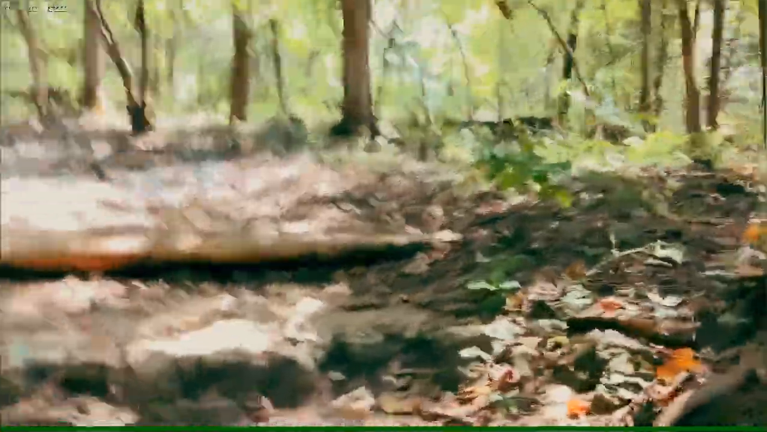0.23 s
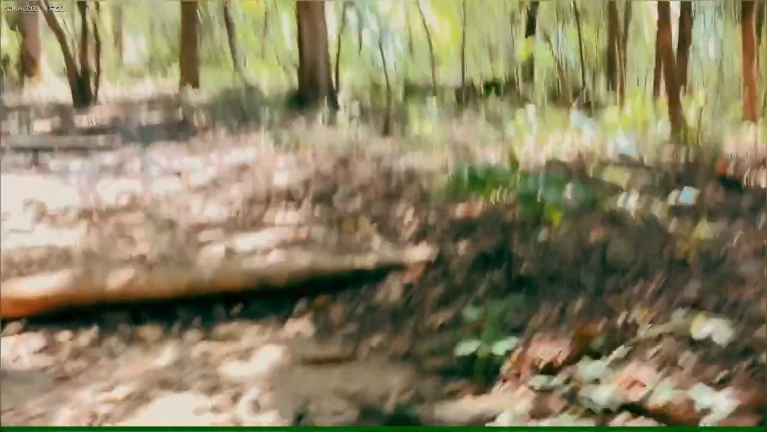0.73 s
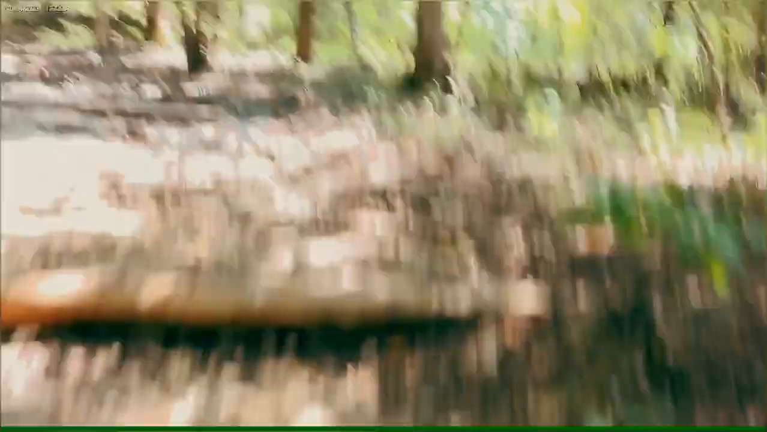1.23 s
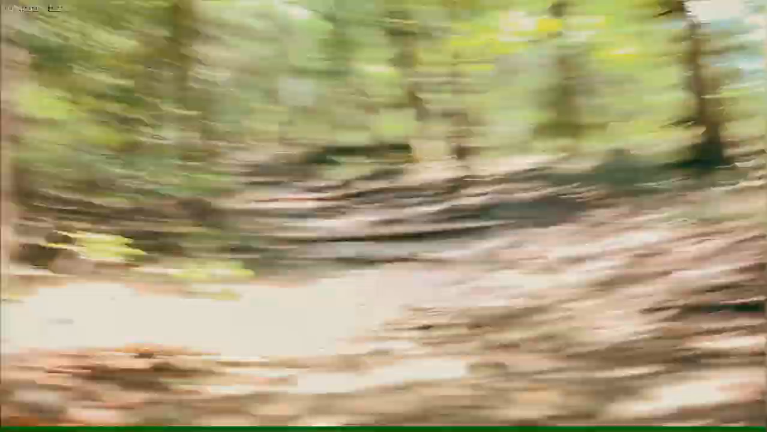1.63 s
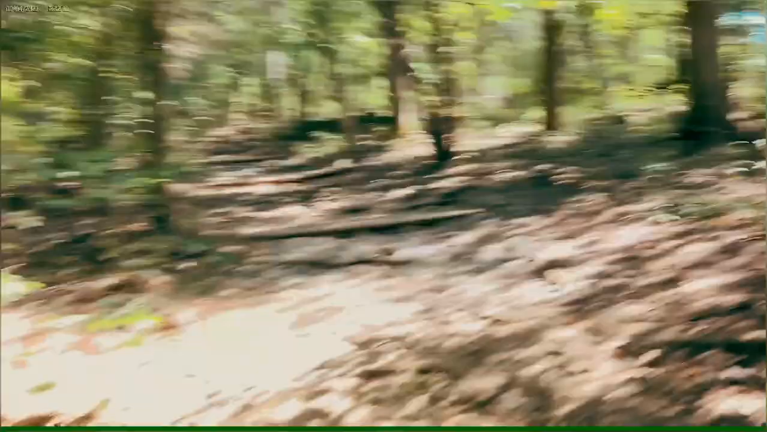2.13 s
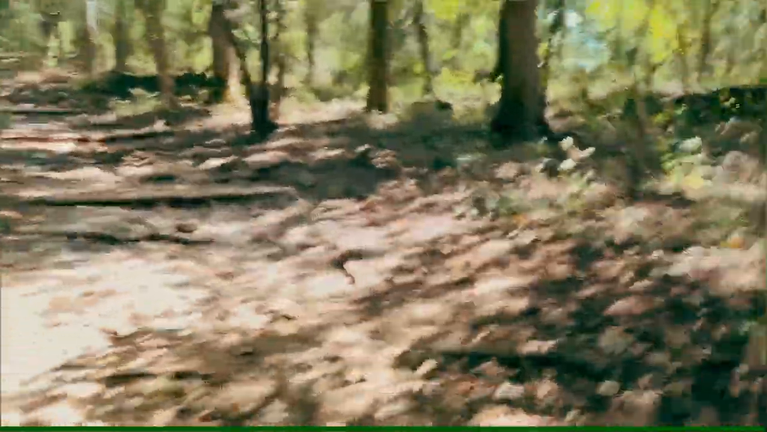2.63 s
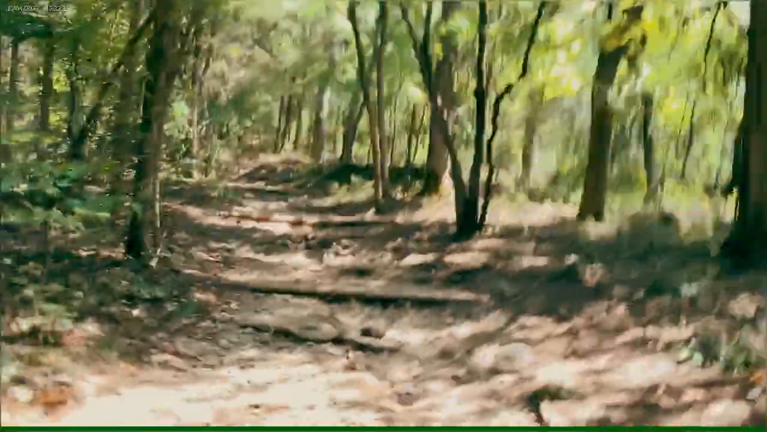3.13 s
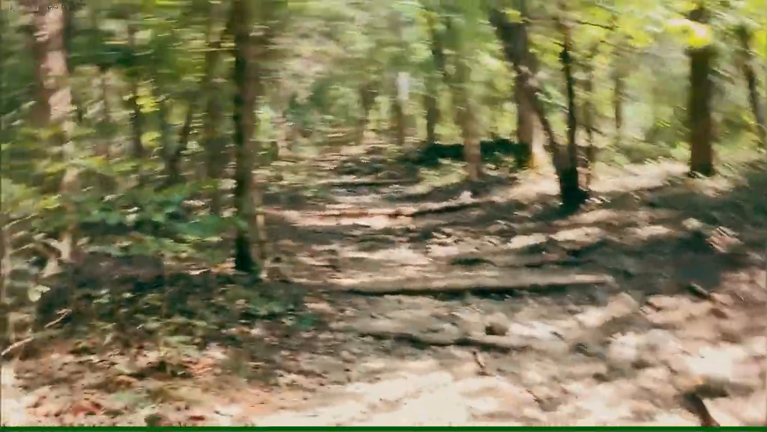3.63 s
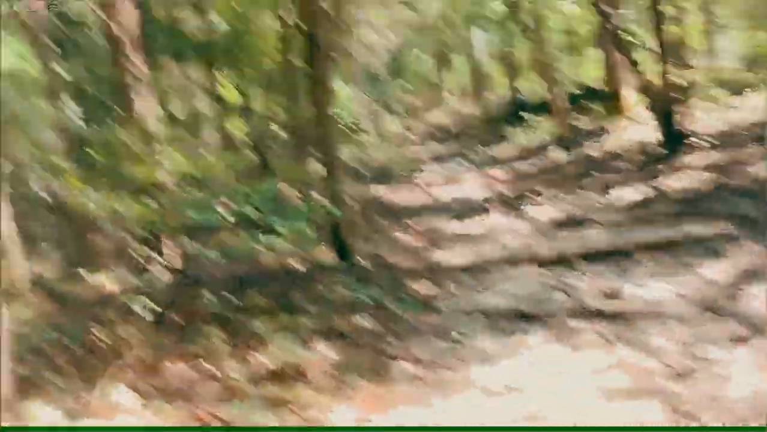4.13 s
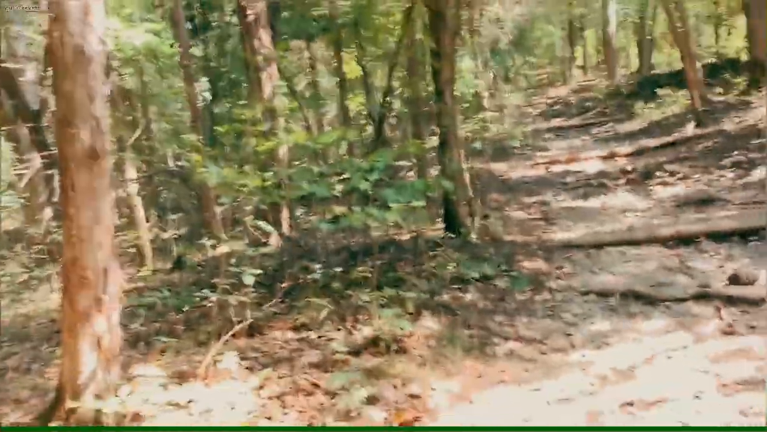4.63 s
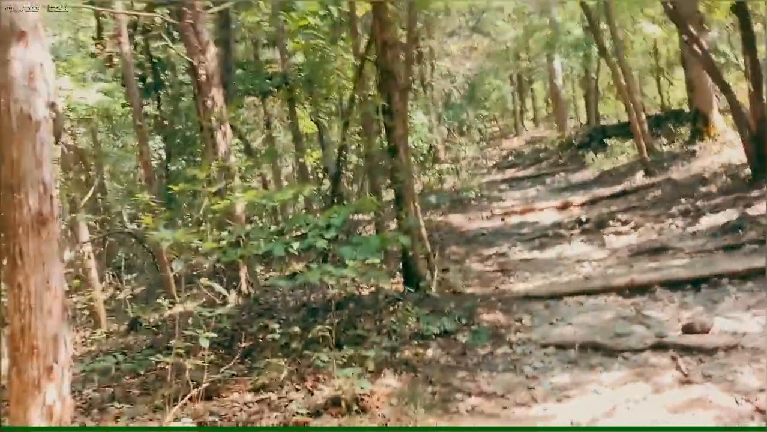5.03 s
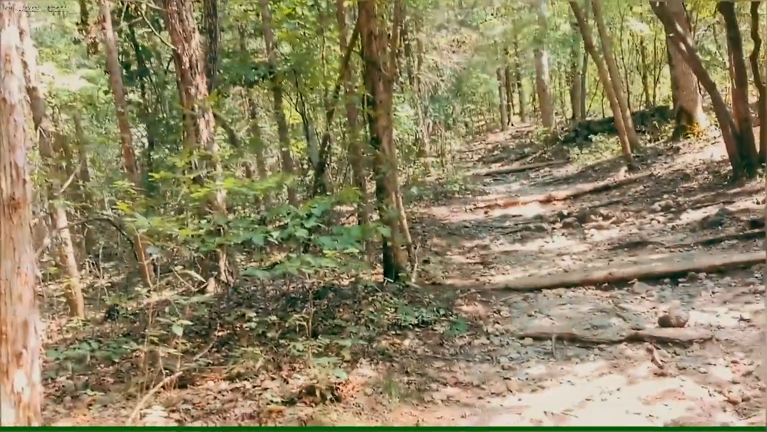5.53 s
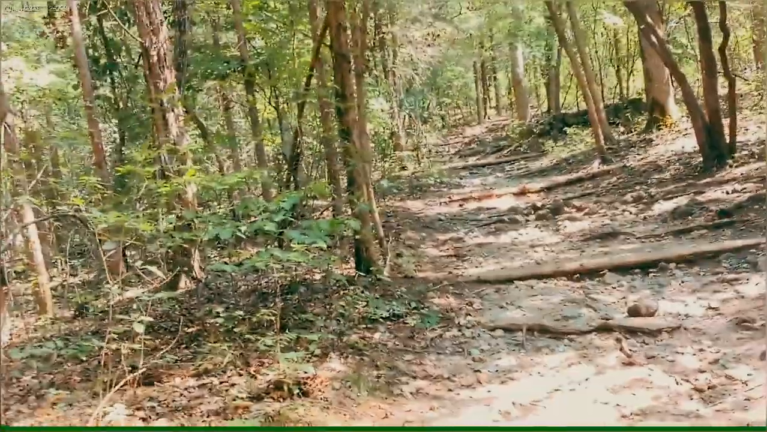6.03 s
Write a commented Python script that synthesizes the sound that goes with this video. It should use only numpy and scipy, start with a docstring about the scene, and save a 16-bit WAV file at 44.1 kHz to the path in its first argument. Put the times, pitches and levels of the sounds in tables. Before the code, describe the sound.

Cicadas drone in summer woodland, two close ones inside a wide, high chorus that swells and sinks. A walker's shoe crunches on a root, then scuffs irregularly over dirt and grit, while soft puffs of air bump the hand-held microphone. Past the middle a stone clacks and a dry twig snaps. The steps stop, the cicadas wind down, and a faint, low, distant drone swells briefly near the end.

```python
"""Cicadas drone in summer woodland, their clicking tymbals ringing the abdomen. Two near ones slowly
speed up inside a wide chorus where narrow bands of buzz swell and sink, then all of them wind down.
A walker's shoes crunch on a root, scuff dirt and grit, clack a stone and snap a dry twig.
Air nudges the hand-held microphone, and a low far-off drone swells briefly near the end."""
import sys
import numpy as np
from scipy import signal
from scipy.fft import rfft, irfft
from scipy.io import wavfile

SR = 44100
rng = np.random.default_rng(int(sys.argv[2]) if len(sys.argv) > 2 else 0)


def generate_wav(sig):
    """Save sig (samples, or channels by samples) to the path in sys.argv[1] as 16-bit PCM at SR."""
    pcm = np.round(np.clip(np.atleast_2d(sig).T, -1, 1) * 32767).astype(np.int16)
    wavfile.write(sys.argv[1], SR, pcm)


N = 277355
TIME_S = np.arange(N) / SR


def from_db(db):
    """Decibels to gain."""
    return 10 ** (np.asarray(db) / 20)


def unit_rms(x):
    """Scale to rms 1."""
    return x / np.sqrt(np.mean(x ** 2) + 1e-20)


def since(start_s):
    """Seconds since start_s, 0 before it."""
    return np.maximum(TIME_S - start_s, 0)


def ramp(start_s, length_s):
    """Linear rise from 0 to 1, then held."""
    return np.minimum(since(start_s) / length_s, 1)


def drift(knots_per_s, size=N):
    """Random wander of spread 1."""
    knots = rng.standard_normal(2048)
    return np.interp(TIME_S[:size] * knots_per_s, np.arange(len(knots)), knots) * np.sqrt(3 / 2)


def cut(x, hz, kind, order=2):
    """Butterworth filter."""
    return signal.sosfilt(signal.butter(order, hz, kind, fs=SR, output="sos"), x)


def colour(x, spectrum, size=8192):
    """Minimum-phase filter with the given spectrum; keeps the power of white noise."""
    hz, db = np.transpose(spectrum)
    grid_hz = np.maximum(np.fft.rfftfreq(size, 1 / SR), 1)
    magnitude = from_db(np.interp(np.log(grid_hz), np.log(hz), db))
    cepstrum = irfft(np.log(magnitude))
    cepstrum[1:size // 2] *= 2
    cepstrum[size // 2 + 1:] = 0
    response = irfft(np.exp(rfft(cepstrum)))
    return signal.fftconvolve(x, response / np.linalg.norm(response))[:N]


def trees(x, t60_s):
    """Diffuse scatter from trunks and leaves, at unit power gain."""
    t = TIME_S[:SR // 2]
    echoes = rng.standard_normal(len(t)) * from_db(-60 * t / t60_s)
    return signal.oaconvolve(x, echoes / np.linalg.norm(echoes))[:len(x)]


def clicks(times_s, sizes):
    """Impulses placed between samples."""
    at = np.clip(times_s * SR, 0, N - 2)
    whole = at.astype(int)
    fraction = at - whole
    return np.bincount(whole, sizes * (1 - fraction), N) + np.bincount(whole + 1, sizes * fraction, N)


def tymbals(rate_hz, jitter_s, uneven_db):
    """Left and right tymbal buckle in turn, one click each per cycle."""
    cycles = np.cumsum(rate_hz) / SR + rng.random()
    beat = np.arange(2, int(2 * cycles[-1]) - 1)
    timing, strength = rng.standard_normal((4096, 2))[:len(beat)].T
    right = beat % 2
    times_s = np.interp(beat / 2 + .003 * right, cycles, TIME_S[:len(cycles)]) + jitter_s * timing
    sizes = from_db(uneven_db * strength - 1.5 * right)
    return unit_rms(clicks(times_s, sizes)[:len(cycles)])


TYMBAL_HZ = 178.6
PACE_HZ = TYMBAL_HZ + 1.27 * since(0.9)
WIND_DOWN_DB = 4.5 * since(4.33)  # base loss, scaled by each fall_ratio

# Cicada abdomen resonance: (frequency [Hz], gain [dB])
ABDOMEN_SPECTRUM = [(1500, -34), (3000, -35.5), (4150, -30), (4600, -17), (5300, -16), (5800, -9),
                    (6250, -4.5), (6650, -3), (7100, -2), (7600, -7), (8500, -11), (9100, -18.5),
                    (9700, -31.5), (10500, -42), (13000, -53.5)]


def near_cicada(rate_hz, scatter_db, turn_rad_per_s, voices, side_hz, side_width_hz, side_gain):
    """Tymbals ring sharp voices (Hz, gain) and a broad side band; tree paths shift as the walker moves."""
    buzz = tymbals(rate_hz + .3 * drift(25), jitter_s=1e-5, uneven_db=1.0)
    turn = turn_rad_per_s * TIME_S + .5 * drift(2.77)
    scatter = np.cos(turn) * trees(buzz, 0.18) + np.sin(turn) * trees(buzz, 0.58)
    voice = sum(gain * signal.lfilter(*signal.iirpeak(hz, Q=50, fs=SR), buzz) for hz, gain in voices)
    side = side_gain * signal.lfilter(*signal.iirpeak(side_hz, side_hz / side_width_hz, fs=SR), buzz)
    return unit_rms(colour(buzz + from_db(scatter_db) * scatter + voice + side, ABDOMEN_SPECTRUM))


def first_cicada(fall_ratio=1.9):
    """Loud, bright opening phrase, then a steady level until the wind-down."""
    phrase = 1 - ramp(0.81, 0.27)
    song = near_cicada(PACE_HZ, scatter_db=-0.5, turn_rad_per_s=2.2, voices=[(6630, from_db(5.5))],
                       side_hz=9600, side_width_hz=670, side_gain=from_db(10) * phrase)
    return song * from_db(-53.5 + 5 * phrase - fall_ratio * WIND_DOWN_DB)


def second_cicada():
    """Slower; drops to a lower resonance, gains a rasp under the main band, then stops."""
    rate_hz = 174.15 + 2.4 * since(2.5)
    opened = ramp(1.46, 0.38)
    fade = 1 - ramp(4.35, 0.26)
    voices = [(6625, from_db(7.5 - 8.1 * opened)), (6320, from_db(10.5) * opened)]
    song = near_cicada(rate_hz, scatter_db=1.5, turn_rad_per_s=2.61, voices=voices,
                       side_hz=4770, side_width_hz=1600, side_gain=from_db(-4) * opened)
    return song * from_db(-46.5 + 0.5 * (2.5 - opened)) * fade


# Paths off nearby trunks: (extra delay [s])
TRUNK_DELAYS_S = [0.0029, 0.0047, 0.0071, 0.0113]


def trunk_echoes(x, gain=0.42, sway_s=4e-5):
    """Echo delays sway with the walker, lifting and cancelling narrow wandering bands."""
    at = np.arange(N)
    delays_s = [delay_s + sway_s * drift(3.5) for delay_s in TRUNK_DELAYS_S]
    return x + gain * sum(np.interp(at - SR * delay_s, at, x) for delay_s in delays_s)


def chorus_band(band, level_db, sag_db_per_s, fall_ratio):
    """One band wavers, sags slowly, then winds down."""
    loss_db = sag_db_per_s * TIME_S + fall_ratio * WIND_DOWN_DB
    return unit_rms(band) * from_db(level_db - loss_db + 0.68 * drift(3.32))


def chorus(count=5, flutter_db=3.0):
    """Far cicadas, each at its own rate and heard only as scatter, over the wash of many more."""
    crowd = from_db(-0.5) * rng.standard_normal(N)
    for ratio in np.linspace(.94, 1.06, count):
        buzz = tymbals(PACE_HZ * ratio + .45 * drift(5), jitter_s=1.5e-5, uneven_db=5.0)
        crowd += unit_rms(trees(buzz, 0.21)) * from_db(flutter_db * drift(22)) / np.sqrt(count)
    song = colour(trunk_echoes(crowd), ABDOMEN_SPECTRUM)
    spectrum, hz = rfft(song), np.fft.rfftfreq(N, 1 / SR)
    low = irfft(spectrum * np.interp(hz, [5300, 6000], [1, 0]), N)
    high = irfft(spectrum * np.interp(hz, [7700, 8400], [0, 1]), N)
    return (chorus_band(song - low - high, level_db=-44, sag_db_per_s=0.098, fall_ratio=1.18)
            + chorus_band(low, level_db=-60, sag_db_per_s=0.082, fall_ratio=0.8)
            + chorus_band(high, level_db=-52.5, sag_db_per_s=0.54, fall_ratio=1.46))


# Swelling bands of cicada buzz:
# (centre [s], length [s], pitch [Hz], bandwidth [Hz], throb rate [Hz], relative level [dB])
BUZZ_SWELLS = [(0.326, 0.33, 7050, 120, 74, -43.5), (0.45, 2.1, 8740, 130, 41, -57),
               (0.55, 1.2, 9040, 120, 55, -66), (0.55, 1.3, 9470, 110, 42, -57),
               (0.6, 0.69, 9900, 130, 45, -66), (0.849, 0.48, 6580, 110, 49, -41.5),
               (0.872, 0.22, 6990, 140, 62, -41), (1.339, 0.089, 8900, 300, 54, -50),
               (1.75, 0.43, 6800, 140, 48, -44), (2.002, 0.9, 7380, 130, 53, -47),
               (2.049, 0.7, 6630, 130, 46, -48), (2.099, 1.1, 4880, 120, 55, -55.5),
               (2.599, 1.5, 4590, 335, 42, -61), (2.605, 0.76, 8670, 130, 43, -63),
               (3.103, 0.9, 9040, 160, 50, -59), (3.24, 0.2, 7020, 300, 55, -40),
               (4.417, 0.65, 4650, 170, 35, -62.5), (4.45, 0.6, 5800, 300, 50, -52),
               (4.453, 0.8, 7330, 117.5, 51, -56), (4.548, 1.1, 8400, 151, 37, -57),
               (4.6, 0.8, 9160, 120, 49, -66), (4.9, 1.4, 5520, 420, 43, -52),
               (5.101, 0.43, 6730, 101, 51, -49.5), (5.1, 0.62, 7530, 131, 51, -51),
               (5.308, 1.1, 5250, 180, 39, -64), (5.396, 0.9, 4390, 400, 33, -69),
               (5.5, 1.1, 7850, 400, 42, -56), (5.857, 0.98, 6080, 300, 48, -56)]


def buzz_swells(throb_depth=0.45):
    """Narrow bands of the cicada buzz swell, throb and sink."""
    out = np.zeros(N)
    for centre_s, length_s, hz, width_hz, throb_hz, level_db in BUZZ_SWELLS:
        active = np.abs(TIME_S - centre_s) < length_s / 2
        size = active.sum()
        rate_hz = hz / (2 * np.round(hz / (2 * TYMBAL_HZ)))  # centres an even harmonic in the band
        buzz = tymbals(rate_hz + 1.2 * drift(30, size), jitter_s=2e-5, uneven_db=3.0)
        tone = cut(trees(buzz, 0.1), [hz - width_hz / 2, hz + width_hz / 2], "band")
        throb_cycles = np.cumsum(throb_hz * (1 + 0.239 * drift(13, size))) / SR
        throb = 1 + throb_depth * np.cos(2 * np.pi * throb_cycles)
        arch = np.cos(np.pi * (TIME_S[active] - centre_s) / length_s)
        out[active] += from_db(level_db + drift(13.3, size)) * arch * unit_rms(tone * throb)
    return from_db(-5) * out


# Woodland background: (frequency [Hz], relative density [dB])
AIR_SPECTRUM = [(15, -4.5), (35, 1), (70, -2.5), (120, -7), (200, -12.5), (400, -18), (800, -25),
                (1500, -32.5), (2500, -36), (4000, -43), (9000, -44), (11500, -46), (16000, -48.5)]


def still_air():
    """Steady background noise, strongest in the bass."""
    return from_db(-49) * colour(rng.standard_normal(N), AIR_SPECTRUM)


# Sole on ground: (frequency [Hz], gain [dB])
GROUND_SPECTRUM = [(60, -15), (220, 1.5), (340, -4.5), (440, -1), (680, 1.5), (1000, -3), (1450, -4),
                   (2000, -7.5), (3200, -8), (4200, -3.5), (7000, 4), (10000, -18), (15000, -46)]


def litter_rustle():
    """Faint, restless rustle of litter underfoot."""
    litter = cut(colour(rng.standard_normal(N), GROUND_SPECTRUM), 1970, "low")
    return unit_rms(litter) * from_db(-67.5 + 2.5 * drift(45))


def sole_slips(slips, surface, grain_db, attack_share, grain_samples=24):
    """Each slip crushes a quickly thinning burst of grit; long slips start softly."""
    out, t = np.zeros(N + SR), TIME_S[:SR // 4]
    for start_s, level_db, decay_s, cutoff_hz in slips:
        noise = rng.standard_normal(len(t))
        grains = from_db(grain_db * rng.standard_normal(len(t) // grain_samples + 1))
        grit = noise * grains.repeat(grain_samples)[:len(t)]
        envelope = (1 - np.exp(-t / (attack_share * decay_s))) * np.exp(-t / decay_s)
        burst = cut(grit * envelope, cutoff_hz, "low", order=3)
        body = cut(burst, 6500, "low")
        at = int(start_s * SR)
        out[at:at + len(t)] += burst * from_db(level_db) * np.linalg.norm(envelope) / np.linalg.norm(body)
    return colour(out, surface)


# Shoe on a root: (time [s], relative level [dB], decay [s], cutoff [Hz])
ROOT_SLIPS = [(0.248, -47, 0.0068, 1700), (0.2562, -31.5, 0.0021, 2600), (0.2602, -28.5, 0.0017, 1200),
              (0.2665, -37, 0.0039, 3000), (0.277, -34, 0.004, 1190), (0.2815, -26, 0.0012, 5000),
              (0.2848, -28.5, 0.0016, 5200), (0.2932, -35, 0.0024, 3000), (0.2978, -28.5, 0.002, 6400),
              (0.316, -29.5, 0.002, 2670)]
# Root resonance: (frequency [Hz], gain [dB])
ROOT_SPECTRUM = [(60, -9), (260, -4.5), (370, 0), (530, 7.5), (680, 1.5), (950, -7), (1250, 2), (1520, 2),
                 (1800, -7), (2300, -11), (3250, -1), (3650, -7), (4300, -1), (7000, -9.5), (12000, -13.5)]


def root_crunch():
    """A shoe grinds and knocks over a woody root."""
    return from_db(-1.5) * sole_slips(ROOT_SLIPS, ROOT_SPECTRUM, grain_db=1, attack_share=0.36)


# Shoe on dirt: (time [s], relative level [dB], decay [s], cutoff [Hz])
DIRT_SLIPS = [(0.335, -52, 0.065, 1700), (0.3672, -42.5, 0.0022, 1900), (0.406, -45.5, 0.003, 1500),
              (0.425, -50.5, 0.022, 1700), (1.051, -46, 0.017, 1600), (1.178, -47, 0.01, 1600),
              (1.202, -46, 0.01, 1800), (1.258, -52.5, 0.026, 2400), (1.879, -44.5, 0.01, 1400),
              (1.964, -44.5, 0.041, 2300), (1.994, -45, 0.0036, 2000), (2.034, -37.5, 0.0045, 5500),
              (2.06, -45.5, 0.007, 2200), (2.1117, -33, 0.0023, 2390), (2.163, -44.5, 0.014, 3440),
              (2.2315, -38, 0.0025, 1900), (2.323, -47.5, 0.016, 2100), (2.6237, -46.5, 0.0022, 1400),
              (2.645, -53, 0.02, 1500), (2.837, -47.5, 0.028, 1900), (3.642, -39, 0.0029, 4500),
              (3.7183, -30, 0.0013, 5500), (3.722, -47, 0.017, 4500), (3.7464, -26.5, 0.0014, 5500),
              (3.777, -37, 0.0044, 2500), (3.783, -31.5, 0.0016, 1500), (3.797, -35, 0.0081, 7500),
              (4.229, -42, 0.0081, 1900), (4.2424, -33, 0.0021, 1900), (4.295, -50, 0.0064, 2980),
              (4.34, -49.5, 0.008, 1000), (4.718, -48.5, 0.0059, 3000)]


def dirt_scuffs(settle_lag_s=0.054, settle_decay_s=0.0063, settle_cutoff_hz=1940):
    """Shoes scuff dirt; loosened grit settles faintly after each slip."""
    settling = []
    for start_s, *_ in DIRT_SLIPS:
        late, faint = rng.standard_normal(2)
        settle_s = start_s + settle_lag_s * np.exp(0.33 * late)
        settling.append((settle_s, -62 - 3.5 * faint, settle_decay_s, settle_cutoff_hz))
    return from_db(-1) * sole_slips(DIRT_SLIPS + settling, GROUND_SPECTRUM, grain_db=4, attack_share=0.3)


# Puffs on the microphone: (time [s], relative peak [dB], frequency [Hz])
AIR_PUFFS = [(1.134, -30, 46.7), (1.162, -28.5, 36.4), (2.161, -30.5, 46.4), (2.206, -20.5, 84)]


def air_puffs(eddy_decay_s=0.24, eddy_cutoff_hz=57):
    """Each puff is a pressure dip between two soft rises, leaving low, dying turbulence."""
    pressure, stir = np.zeros(N), np.zeros(N)
    for time_s, peak_db, hz in AIR_PUFFS:
        spread = (np.pi * hz * (TIME_S - time_s)) ** 2
        pressure += from_db(peak_db) * (2 * spread - 1) * np.exp(-spread)
        stir += from_db(peak_db) * (TIME_S > time_s) * np.exp(-since(time_s) / eddy_decay_s)
    eddies = unit_rms(cut(rng.standard_normal(N), eddy_cutoff_hz, "low", order=3))
    return from_db(-2) * pressure + from_db(-23) * stir * eddies


def struck(hits, modes, crumble_db, crumble_s):
    """Each contact, an impulse with a brief crumble, rings the same damped modes."""
    t, force, out = TIME_S[:SR // 50], np.full(N, 1e-18), np.zeros(N)
    for time_s, level_db, cutoff_hz in hits:
        contact = (t == 0) + from_db(crumble_db) * np.exp(-t / crumble_s) * rng.standard_normal(len(t))
        at = int(time_s * SR)
        force[at:at + len(t)] += from_db(level_db) * cut(contact, cutoff_hz, "low", order=3)
    for hz, gain_db, t60_s in modes:
        radius = from_db(-60 / (t60_s * SR))
        pole_real = radius * np.cos(2 * np.pi * hz / SR)
        out += from_db(gain_db) * signal.lfilter([1, -pole_real], [1, -2 * pole_real, radius ** 2], force)
    return out


# Stone contacts: (time [s], relative force [dB], cutoff [Hz])
STONE_HITS = [(3.7812, -22, 4800), (3.7845, -5.5, 1230), (3.7866, -12.5, 4950), (3.7911, -7.5, 11000),
              (3.7921, -16.5, 9000), (3.8115, -39, 8500), (3.8135, -23, 1300)]
# Stone modes: (frequency [Hz], gain [dB], t60 [s])
STONE_RING = [(195, -28, 0.012), (663, -29, 0.043), (790, -26.5, 0.017), (1060, -27, 0.016),
              (1900, -18, 0.0024), (3970, -8, 0.0038), (4670, -8.5, 0.0045), (5340, -11, 0.0051),
              (6800, -0.5, 0.0047), (7500, -28, 0.005)]


def stone_clack():
    """A stone clacks under the shoe, dull at first, then hard."""
    clack = struck(STONE_HITS, STONE_RING, crumble_db=-17.5, crumble_s=0.00064)
    return from_db(-1.5) * cut(clack, 8460, "low", order=12)


# Fibre breaks: (time [s], relative force [dB], cutoff [Hz])
TWIG_BREAKS = [(3.984, -19, 8000), (3.9878, -33, 8000), (3.9903, -14.5, 9100), (3.9912, -21, 8000),
               (3.9954, -9.5, 9700), (3.9969, -20, 9000), (3.9982, -21, 8000)]
# Twig modes: (frequency [Hz], gain [dB], t60 [s])
TWIG_RING = [(1600, -44, 0.0031), (2750, -15, 0.0042), (3980, -13, 0.0023), (7370, 4, 0.0037),
             (8200, -15, 0.0027), (12800, -27, .004)]


def twig_snap():
    """A dry twig cracks fibre by fibre."""
    return from_db(-12) * struck(TWIG_BREAKS, TWIG_RING, crumble_db=-12, crumble_s=0.0007)


def far_drone(pitch_hz=96):
    """A low, wavering tone swells, holds briefly and sinks."""
    phase = 2 * np.pi * np.cumsum(pitch_hz + drift(9.2)) / SR
    swell = ramp(5.09, 0.64) - ramp(5.86, 0.24)
    return np.sin(phase) * from_db(-46 + 2 * drift(14)) * swell


def scene():
    """Cicadas, footsteps with their scatter off the trees, air and the drone; mono."""
    insects = first_cicada() + second_cicada() + chorus() + buzz_swells()
    cracks = stone_clack() + twig_snap()
    steps = dirt_scuffs() + root_crunch()
    scatter = from_db(-8) * trees(cracks, 0.13) + from_db(-7.5) * trees(steps + 0.22 * cracks, 0.11)
    feet = steps + cracks + scatter
    return (insects + feet + air_puffs() + still_air() + litter_rustle() + far_drone())[None]


def record(dry, low_hz=14, high_hz=15750):
    """The microphone loses the deepest bass; the top is cut steeply."""
    lowpass = signal.ellip(12, .1, 80, high_hz, fs=SR, output="sos")
    return signal.sosfilt(lowpass, cut(dry, low_hz, "high"))


dry = scene()
out = record(dry)
generate_wav(out)
```